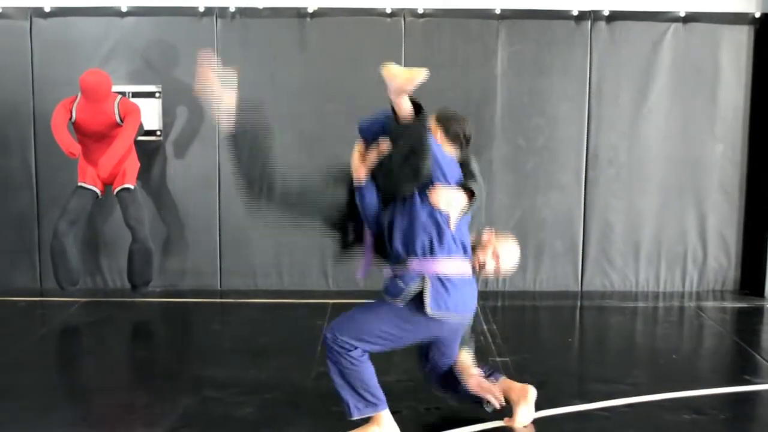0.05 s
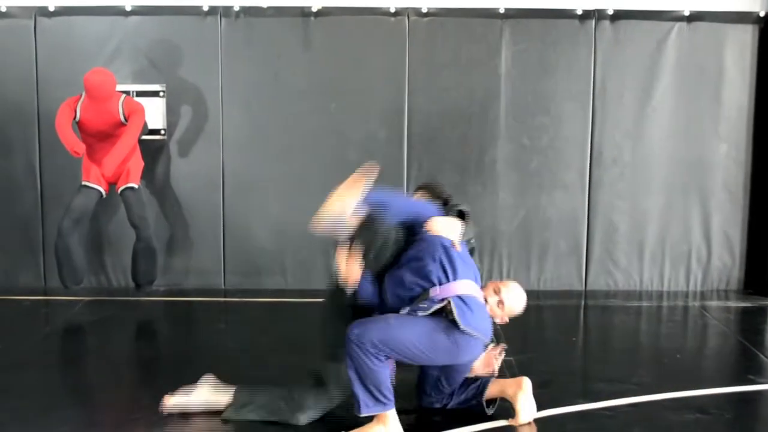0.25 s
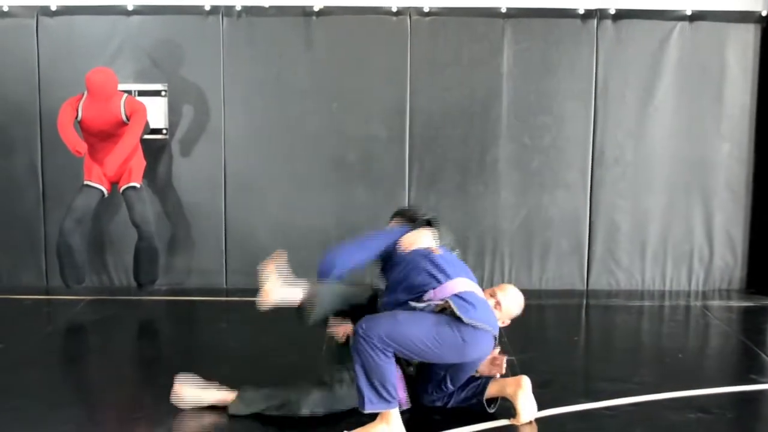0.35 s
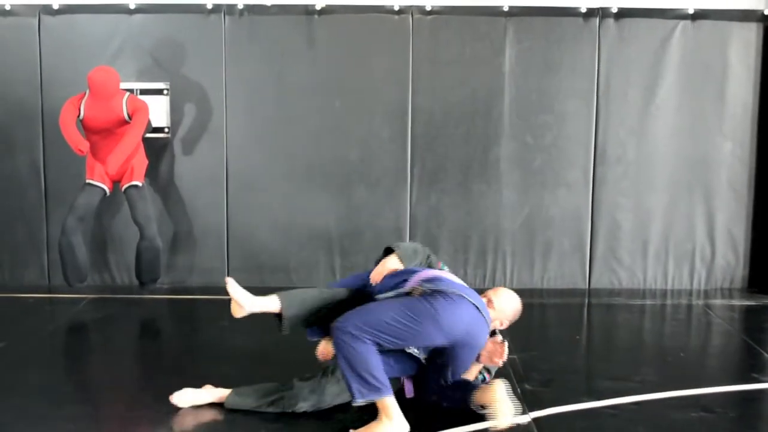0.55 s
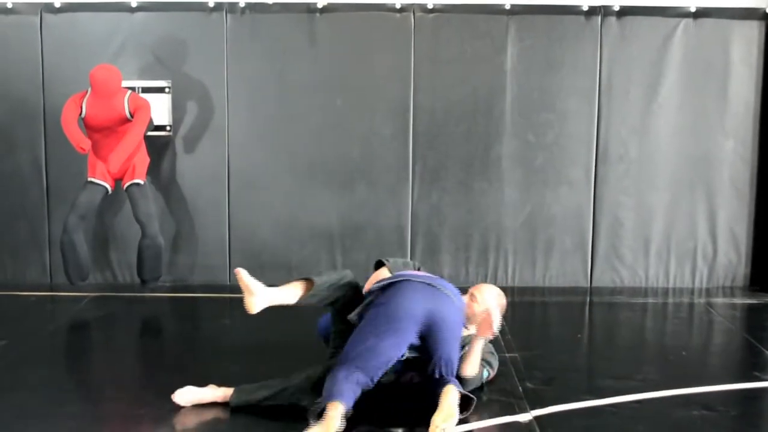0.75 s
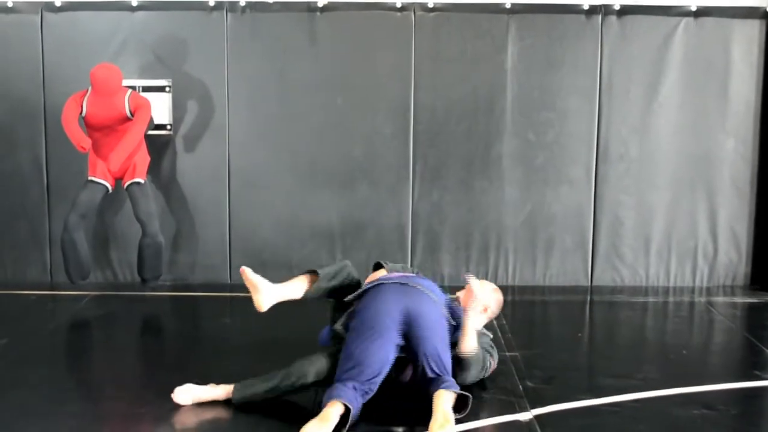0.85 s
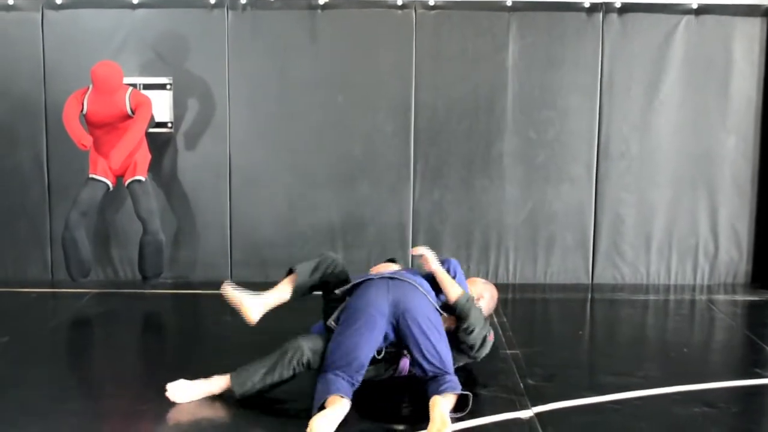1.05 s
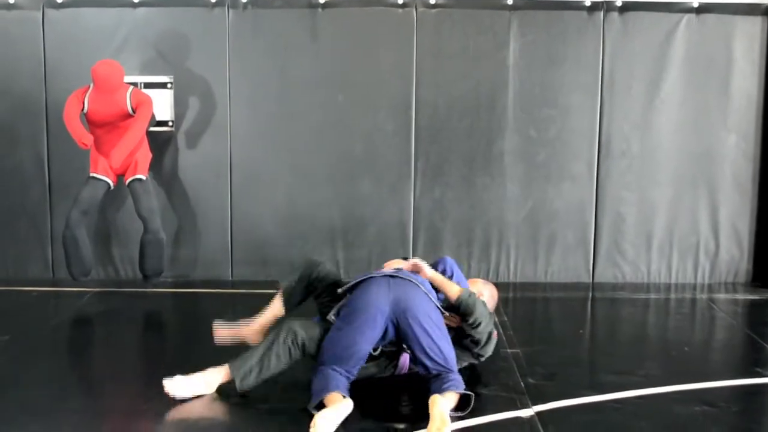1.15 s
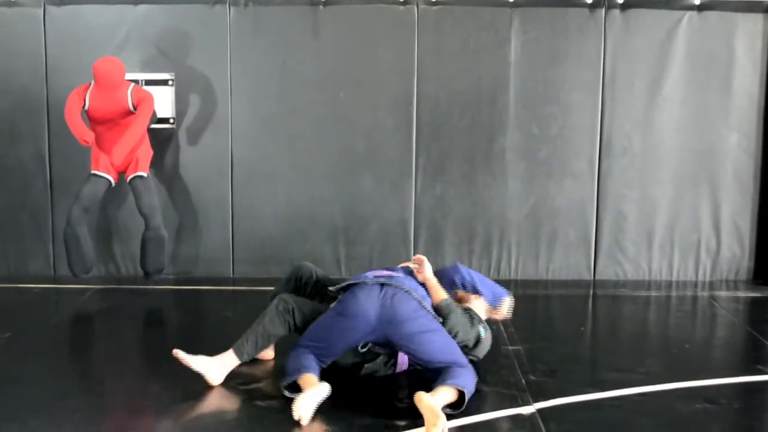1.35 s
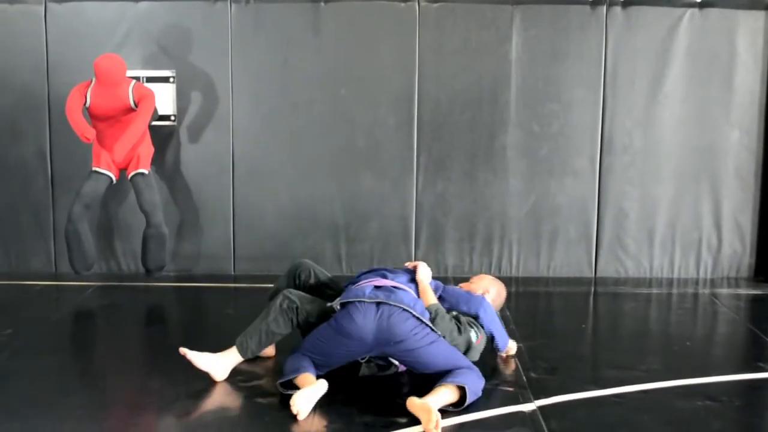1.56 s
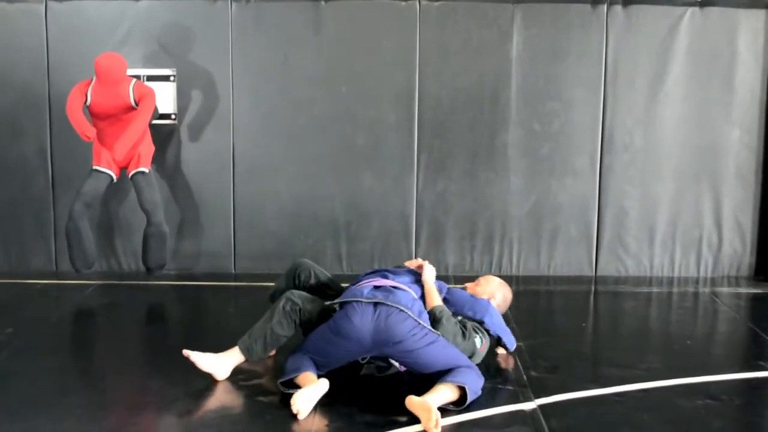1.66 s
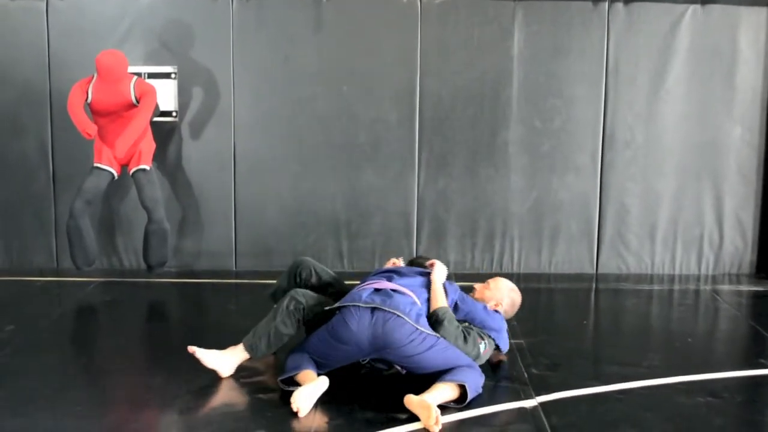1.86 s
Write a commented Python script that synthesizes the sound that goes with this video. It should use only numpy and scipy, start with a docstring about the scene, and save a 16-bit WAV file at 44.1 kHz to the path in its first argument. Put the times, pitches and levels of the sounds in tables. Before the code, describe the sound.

A loud, booming body slam on a mat, then scuffing feet and a slap, echoing indoors.

```python
"""A wrestler slams onto a padded mat in an echoing gym: two footfalls, the body, then the legs.
Each blow squeezes out a puff of air, smacks skin on vinyl and makes the mat boom. Feet squeak and
scuff as they stick and slip, a hand slaps the mat, and heavy jackets rustle over the ventilation.
The slam overloads a near-mono recorder, whose limiter turns the volume down and lets it back up."""
import sys
import numpy as np
from scipy import signal
from scipy.fft import rfft, irfft, next_fast_len
from scipy.io import wavfile

SR = 44100
rng = np.random.default_rng(int(sys.argv[2]) if len(sys.argv) > 2 else 0)


def int16_out(signal):
    """Quantize to a 16-bit WAV file."""
    q = np.round(np.clip(np.atleast_2d(signal).T, -1, 1) * 32767)
    wavfile.write(sys.argv[1], SR, q.astype(np.int16))


N = 83790
TIME = np.arange(N) / SR


def from_db(db):
    """Turn decibels into a number to multiply by."""
    return 10 ** (np.asarray(db) / 20)


def rms_one(x):
    """Scale a sound so that its average strength (rms) is 1."""
    return x / np.sqrt(np.mean(x ** 2) + 1e-20)


def at_hz(points, hz, column=1):
    """Read a table at any frequency, blending between rows on a musical (log) scale."""
    table = np.array(points)
    return np.interp(np.log(np.maximum(hz, 1)), np.log(table[:, 0]), table[:, column])


def cut(x, hz, kind, order=2):
    """Keep only the "low", "high" or middle ("band") part of a sound."""
    sections = signal.butter(order, np.clip(hz, 10, SR * .45), kind, fs=SR, output="sos")
    return signal.sosfilt(sections, x + 1e-18)


def colour(x, points):
    """Shape the tone along a curve of (frequency [Hz], level [dB]) points."""
    half = next_fast_len(N)
    gains = from_db(at_hz(points, np.linspace(0, SR / 2, half + 1)))
    cepstrum = irfft(np.log(gains))
    # fold it so that the filter never rings ahead of the sound (minimum phase)
    cepstrum[1:half] *= 2
    cepstrum[half + 1:] = 0
    return irfft(rfft(x, 2 * half) * np.exp(rfft(cepstrum)))[:N]


def later(x, s):
    """Delay a sound by s seconds."""
    return np.pad(x, (max(int(s * SR), 0), 0))[:N]


def add(out, sound, s):
    """Mix a sound in at s seconds."""
    start = int(np.clip(s * SR, 0, N - 1))
    out[start:start + len(sound)] += sound[:N - start]


def ring(hz, fade_s):
    """A pure tone that dies away by 60 dB in fade_s seconds."""
    t = TIME[:int(1.5 * fade_s * SR) + 2]
    return np.sin(2 * np.pi * hz * t) * 1e-3 ** (t / fade_s)


def grains(per_s, spread_db, size=N):
    """Tiny clicks of uneven size at random moments."""
    sizes = from_db(spread_db * np.minimum(rng.exponential(1, size), np.pi))
    signs = rng.choice([-1, 1], size)
    return rms_one(sizes * signs * (rng.random(size) < per_s / SR))


def microphone_hiss():
    """The microphones' own faint, steady noise."""
    # tone of the hiss: (frequency [Hz], level [dB])
    tone = [(50, -7), (180, 3), (1500, -17.5), (6000, -14), (10000, 5), (15000, 3)]
    return from_db(-60.5) * rms_one(colour(rng.standard_normal(N), tone))


def ventilation():
    """Moving air makes a steady rush, with some microphone hiss on top."""
    # tone of the rush and hiss: (frequency [Hz], level [dB])
    tone = [(20, -4.5), (40, -11), (90, -11.5), (350, -16), (900, -12.5), (2000, -21.5), (5000, -32.5),
            (9000, -19.5), (15000, -20)]
    return from_db(-43) * rms_one(colour(rng.standard_normal(N), tone))


def gym_echo(x):
    """Sound bounces off nearby surfaces, then fills the hall with a long, fading tail."""
    # bounces off the floor and a padded wall: (delay [s], level [dB])
    echoes = [(.0060, -14), (0.015, -22), (0.0236, -16.5)]
    # the hall's tail: (frequency [Hz], level [dB], time to fade by 60 dB [s])
    hall = [(60, -11, 2.37), (180, -3, 0.81), (254, -4, 1.18), (347, -1.5, 1.57), (540, -3.5, 1.19),
            (776, -3, 1.43), (1110, -3, 1.52), (1620, -8.5, 0.54), (3200, -6, 1.86), (5350, -5, 1.18),
            (9100, -12.5, 0.52), (15000, -16, 0.16)]
    build_s, tail_delay_s = 0.0024, 0.0073
    near = cut(sum(from_db(db) * later(x, s) for s, db in echoes), 4770, "low", order=1)
    edges = np.geomspace(40, 18000, 19)
    tail = np.zeros(N)
    for low, high in zip(edges, edges[1:]):
        hz = np.sqrt(low * high)
        shape = (1 - np.exp(-TIME / build_s)) * 1e-3 ** (TIME / at_hz(hall, hz, column=2))
        band = rms_one(shape * cut(rng.standard_normal(N), [low, high], "band"))
        tail += band * from_db(at_hz(hall, hz)) * np.sqrt(2 * (high - low) / SR / N)
    add(tail, from_db(-63.5) * ring(hz=355.3, fade_s=1.95), 0)  # a standing wave: one note lingers
    return near + from_db(-1.5) * later(signal.fftconvolve(x, tail)[:N], tail_delay_s)


def jackets():
    """Thick cotton folds rub together in thousands of tiny clicks."""
    # how the rustle swells and fades: (time [s], level [dB])
    rustle = [(0, -41.5), (.06, -38.5), (.12, -42), (.20, -37), (.26, -32), (.36, -25.5), (.47, -29.5),
              (.58, -34), (.75, -42.5), (1.0, -41.5), (1.2, -49), (1.42, -40.5), (1.6, -49.5), (1.9, -49.5)]
    # tone of the cloth: (frequency [Hz], level [dB])
    cloth = [(60, -21.5), (200, -8), (700, -8), (1700, -9), (4800, -12), (8000, -16), (15000, -31.5)]
    loudness = from_db(np.interp(TIME, *np.transpose(rustle)))
    return loudness * rms_one(colour(grains(per_s=3000, spread_db=0.5), cloth))


def scuffs():
    """Skin drags over vinyl, sticking and slipping: a scrape with a squeak in it."""
    # drags: (time [s], level [dB], rise [s], decay [s], squeak pitch [Hz], squeak width [Hz],
    # scrape level relative to the squeak [dB])
    drags = [(.860, -23, 0.014, 0.011, 1000, 148, -1.5), (.884, -32, 0.0096, 0.041, 1180, 320, -4.5),
             (.898, -34, 0.013, 0.0052, 3896, 700, -26)]
    # tone of the scrape: (frequency [Hz], level [dB])
    scrape_tone = [(100, -13), (250, 3), (500, 1.5), (720, -1), (1300, -3), (2000, 1), (4000, -5.5),
                   (8000, -12.5), (12000, -11), (15500, -37)]
    out = np.zeros(N)
    for s, db, rise_s, decay_s, hz, width_hz, scrape_db in drags:
        slips = grains(per_s=2500, spread_db=2.0)
        squeak = rms_one(cut(slips, [hz - width_hz / 2, hz + width_hz / 2], "band", order=1))
        scrape = from_db(scrape_db) * rms_one(colour(slips, scrape_tone))
        swell = np.minimum(TIME / rise_s, 1) * np.exp(-np.maximum(TIME - rise_s, 0) / decay_s)
        out += later(from_db(db) * swell * (squeak + scrape), s)
    return out


def squeaks():
    """A turning sole catches: its slips fall into step and sing a thin, wavering note."""
    # chirps of the sole: (time [s], length [s], level [dB], pitch [Hz])
    chirps = [(.2360, .0045, -20, 4920), (.2430, 0.0087, -21.5, 5000), (0.25, 0.0066, -27, 5300)]
    waver_share, waver_top_hz = .06, 700
    out = np.zeros(N)
    for s, length_s, db, hz in chirps:
        swell = np.sin(np.pi * TIME[TIME < length_s] / length_s)
        waver = rms_one(cut(rng.standard_normal(N), waver_top_hz, "low"))[-len(swell):]
        pitch_hz = hz * (1 + waver_share * waver)
        add(out, from_db(db) * swell * np.sin(2 * np.pi * np.cumsum(pitch_hz) / SR), s)
    return out


def floor_rumble():
    """The floor gives under the bodies with a short, deep rumble."""
    # weight shifts onto the floor: (time [s], level [dB], pitch [Hz], time to fade by 60 dB [s])
    heaves = [(0.285, -14.5, 75, 0.1), (1.261, -31, 80.7, 0.17), (1.407, -37, 42.5, 0.19)]
    out = np.zeros(N)
    for s, db, hz, fade_s in heaves:
        add(out, from_db(db) * ring(hz, fade_s), s)
    return cut(out, 120, "low")


def skin_slap(decay_s, top_hz, order=1):
    """Skin meets vinyl: a gritty burst of noise that dies almost at once."""
    t = TIME[:SR // 8]
    noise = rng.standard_normal(len(t))
    grit = 0.98 * grains(per_s=3000, spread_db=5.0, size=len(t))
    burst = np.exp(-t / decay_s) * rms_one(noise + grit)
    # make all frequencies equally strong
    even = irfft(np.exp(1j * np.angle(rfft(burst, 2 * len(t)))))[:len(t)]
    dulled = cut(rms_one(even) * burst.std(), top_hz, "low", order=order)
    return dulled * np.sqrt(SR / np.pi / top_hz)  # make up for the lost treble


def hand_slap():
    """A flat hand rolls onto the mat; the air under the palm shapes its tone."""
    # heel first, then palm and fingers: (time [s], level [dB], decay [s], treble limit [Hz])
    contacts = [(1.2571, -15.5, 0.013, 2490), (1.2654, -10, 0.0043, 7000), (1.2705, -14.5, 0.0051, 12000),
                (1.2770, -22.5, 0.024, 4500)]
    # tone of the air under the palm: (frequency [Hz], level [dB])
    palm = [(40, -32), (85, 4.5), (160, -0.5), (340, 0.5), (520, -2.5), (950, -0.5), (1400, 2), (2600, 4),
            (3150, -4.5), (4200, -4), (5300, 3), (7100, 3), (7800, 0.5), (10000, 2.5), (13000, 0),
            (15000, -12)]
    out = np.zeros(N)
    for s, db, decay_s, top_hz in contacts:
        add(out, from_db(db) * skin_slap(decay_s, top_hz, order=2), s)
    return colour(out, palm)


def air_puff(hz):
    """Air squeezed from under a limb swings out and back for a cycle or two."""
    cycles = 2.56
    swing = np.pad(ring(hz, fade_s=cycles / hz), (0, SR // 50))
    swing = cut(swing, 0.48 * hz, "high")  # keep only what lies near the puff's own pitch
    return -2 * cut(swing, 4.64 * hz, "low")


def body_blows():
    """Each blow pushes out a puff of air, slaps skin on vinyl and sets the mat booming."""
    # limbs and bodies land: (time [s], puff level [dB], puff pitch [Hz], slap level [dB],
    # slap treble limit [Hz], slap decay [s], boom level [dB])
    landings = [(0.1573, -12.5, 780, -27.5, 1000, 0.0066, -30), (0.1637, -18, 583, -55, 2480, 0.0043, -46),
                (0.171, -25, 600, -34, 2900, 0.007, -30), (0.2205, -8.5, 298, -17.5, 1210, 0.0071, -56),
                (.2300, -20, 343, -28.5, 900, 0.011, -35), (0.279, 4, 355, 4.5, 1520, 0.0031, -9.5),
                (0.282, 6.5, 1310, 3.5, 3100, 0.0008, -6.5), (0.2866, 1.5, 262, -3.5, 2000, 0.0081, -7.5),
                (0.2932, -2.5, 306, -7.5, 5000, 0.0058, -9), (.3085, -6.5, 1110, -13, 1250, 0.04, -23.5),
                (0.402, -4.5, 346, -13.5, 2600, 0.014, -17), (.4270, -10.5, 440, -18, 1220, 0.013, -16.5),
                (0.565, -14, 320, -27, 1945, 0.0042, -52), (0.5724, -36, 900, -19.5, 8900, 0.0024, -27),
                (0.716, -18.5, 400, -46, 1980, 0.0058, -49), (0.7887, -18, 1450, -24.5, 1400, 0.0044, -50),
                (.868, -32, 480, -44, 3000, .005, -37.5), (1.2585, -12.5, 370, -27, 1500, 0.0064, -26.5),
                (1.2646, -5.5, 1650, -10.5, 3940, 0.0012, -25.5)]
    # notes of the mat on its floor: (pitch [Hz], level [dB], time to fade by 60 dB [s])
    mat_notes = [(78.3, -12.5, 0.088), (142, -4, 0.038), (350.3, -3.5, 0.047), (697.5, -5, 0.058),
                 (1040, -35, 0.021)]
    out = np.zeros(N)
    for s, puff_db, puff_hz, slap_db, top_hz, decay_s, boom_db in landings:
        add(out, from_db(puff_db) * air_puff(puff_hz), s)
        add(out, from_db(slap_db) * cut(skin_slap(decay_s, top_hz), 272, "high", order=1), s)
        for hz, db, fade_s in mat_notes:
            spot_hz = hz * (1 + 0.011 * rng.standard_normal())  # each spot has its own tuning
            add(out, from_db(boom_db + db) * ring(spot_hz, fade_s), s)
    return cut(out, 55, "high")


def scene():
    """The bout in its gym; left and right are alike except for a faint hiss."""
    # tone of the microphones: (frequency [Hz], level [dB])
    mic_tone = [(20, 6), (60, 3.5), (6200, -2), (7800, -7), (16000, -9.5)]
    bout = body_blows() + hand_slap() + scuffs() + squeaks() + jackets()
    air = ventilation()
    hiss = microphone_hiss() * np.array([[1], [-1]])  # opposite signs left and right
    return colour(bout + gym_echo(bout) + floor_rumble() + air, mic_tone) + hiss


def record(dry):
    """A limiter turns the volume down after loud peaks; what slips past clips, and top treble is cut."""
    limit_db, attack_s, recover_db_per_s, cutoff_hz = 1, 0.00022, 47.5, 15900
    peak_db = 20 * np.log10(np.abs(dry).max(axis=0) + 1e-9)
    over_db = np.maximum(peak_db - limit_db, 0)
    recovery_db = recover_db_per_s * TIME
    held_db = np.maximum.accumulate(over_db + recovery_db) - recovery_db
    smoothing = np.exp(-1 / (attack_s * SR))
    dip_db = signal.lfilter([1 - smoothing], [1, -smoothing], held_db)
    limited = np.clip(dry * from_db(-dip_db), -1, 1)
    return signal.sosfilt(signal.ellip(10, .1, 80, cutoff_hz, fs=SR, output="sos"), limited)


dry = scene()
out = record(dry)
int16_out(out)
```